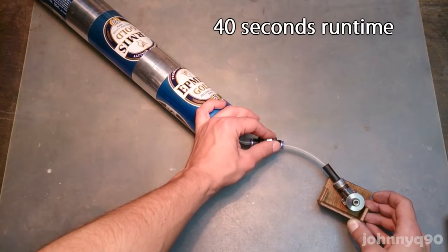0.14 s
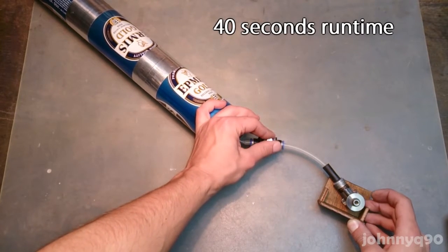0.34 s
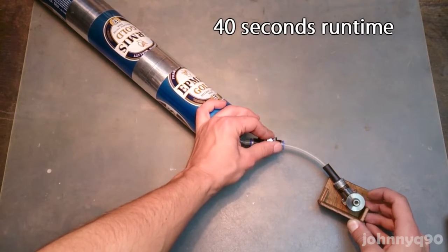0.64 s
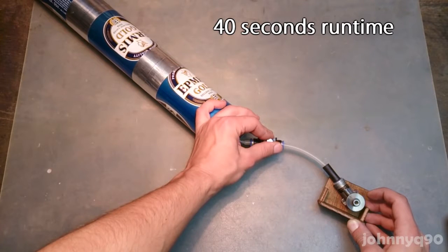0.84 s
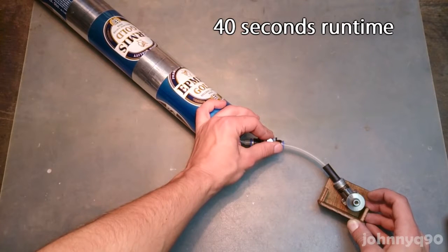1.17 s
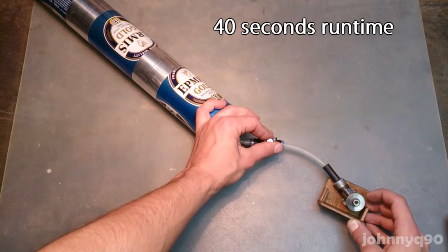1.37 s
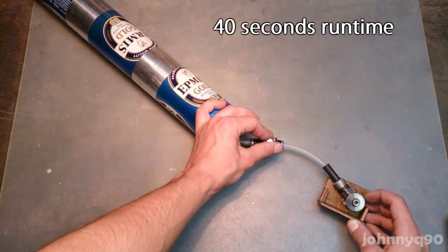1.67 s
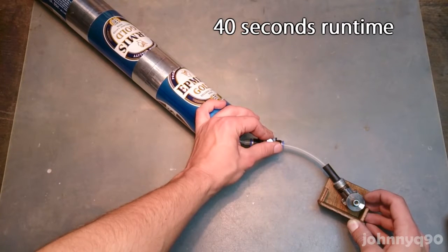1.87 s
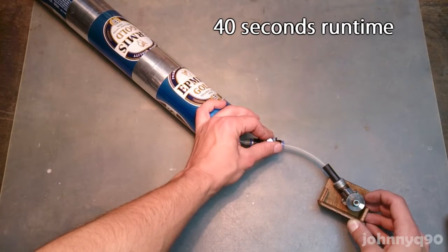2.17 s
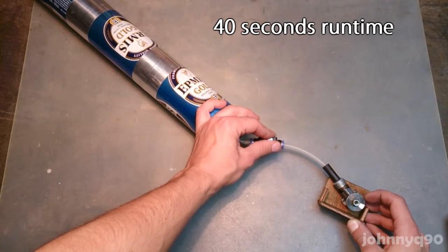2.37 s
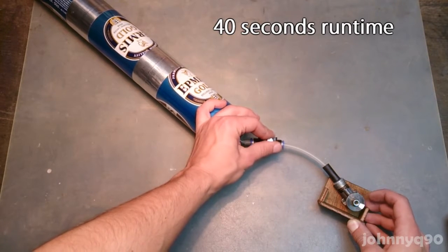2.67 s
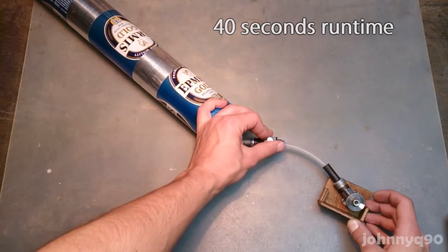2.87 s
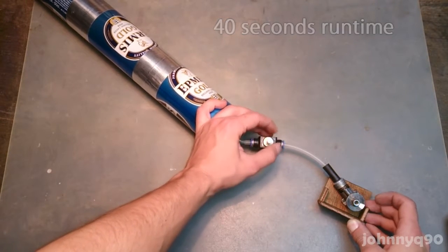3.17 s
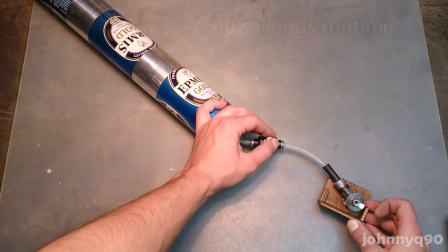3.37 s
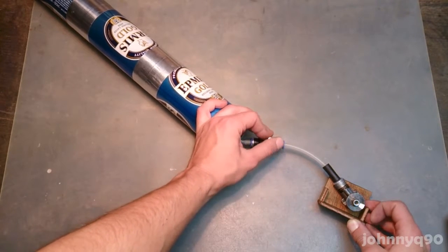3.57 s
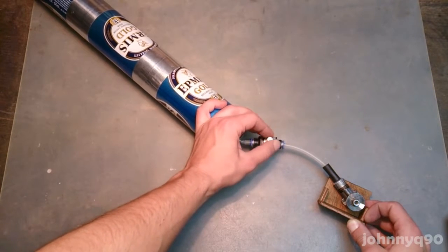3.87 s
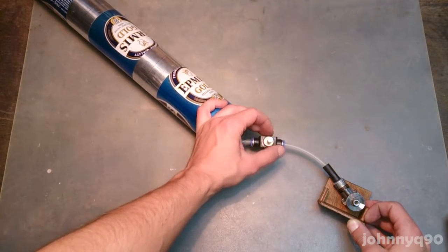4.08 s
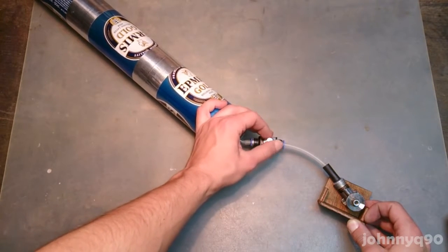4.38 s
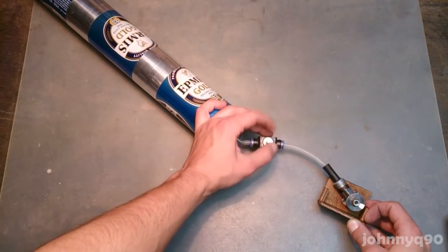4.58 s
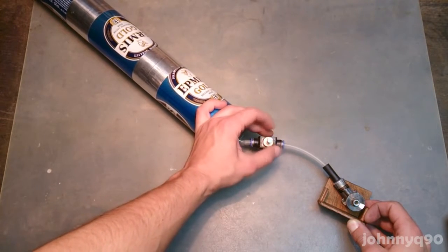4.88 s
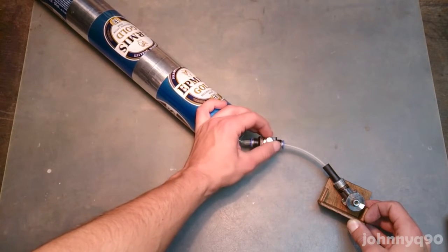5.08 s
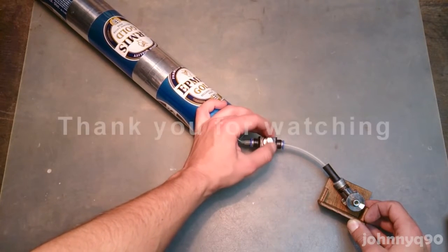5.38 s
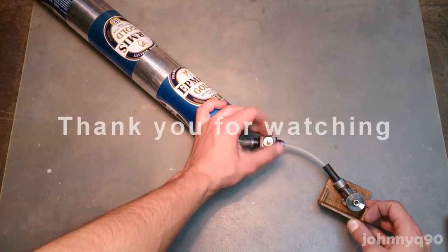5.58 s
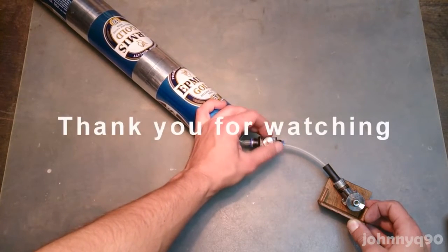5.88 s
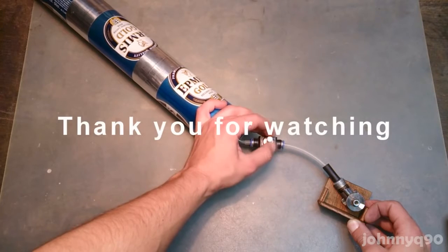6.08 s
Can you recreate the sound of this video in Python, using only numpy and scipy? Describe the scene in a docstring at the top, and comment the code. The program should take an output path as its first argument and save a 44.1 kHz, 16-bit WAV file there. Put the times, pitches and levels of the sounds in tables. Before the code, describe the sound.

A tiny air motor buzzes rapidly with spitting exhaust, slows and stalls, then air hisses on through it, dipping and fading.

```python
"""On a workbench, a tiny single-piston air motor runs from a can, through a hand valve.
Every turn lets out a thump, made of a pressure pulse and ringing parts, and a spit and puff of shaped noise.
The motor slows and stalls just before two seconds. Air, also shaped noise, goes on hissing through it,
dips and swells as the valve is turned, and fades as the can empties. A low room rumble lies underneath."""
import sys
import numpy as np
from scipy import signal
from scipy.fft import rfft, irfft
from scipy.io import wavfile

SR = 44100
rng = np.random.default_rng(int(sys.argv[2]) if len(sys.argv) > 2 else 0)


def master(y):
    """Save y as 16-bit WAV."""
    cut = np.clip(np.atleast_2d(y).T, -1, 1)
    pcm = np.round(cut * 32767)  # scale
    wavfile.write(sys.argv[1], SR, pcm.astype(np.int16))


N = 274743
T = np.arange(N) / SR
HZ = np.fft.rfftfreq(N, 1 / SR)
STALL_S = 1.93


def gain_of(db):
    """Turns decibels into a gain."""
    return 10 ** (np.asarray(db) / 20)


def evened(x):
    """Scales a signal to an rms of 1."""
    return x / np.sqrt(np.mean(x ** 2) + 1e-20)


def read(points, hz):
    """Reads a spectrum, joined by straight lines over log frequency."""
    point_hz, value = np.transpose(points)
    return np.interp(np.log(hz + 1), np.log(point_hz + 1), value)


def shaped(x, db):
    """Colours a sound by a gain in dB at each frequency."""
    return irfft(rfft(x) * gain_of(db), N)


def sides(db):
    """Splits a left-over-right level in dB evenly between the two channels."""
    return np.array([db, -db]).reshape(2, -1) / 2


def noise(db, shared):
    """Makes two channels of coloured noise with a share in common; their mean has an rms of 1."""
    left, right, common = rng.standard_normal((3, N))
    shared = np.clip(shared, 0, 1)
    mixed = np.sqrt(1 - shared) * np.array([left, right]) + np.sqrt(shared) * common
    coloured = shaped(mixed, db)
    return coloured / coloured.mean(0).std()


def wander(rate_hz):
    """Makes a slow random drift with an rms of 1."""
    smoothing = 1 / (1 + (HZ / rate_hz) ** 2)
    return evened(irfft(rfft(rng.standard_normal(N)) * smoothing, N))


def causal(points, size=4096):
    """Makes the sharpest one-sided pulse that has this spectrum (minimum phase)."""
    hz = abs(np.fft.fftfreq(size, 1 / SR))
    log_gain = np.log(gain_of(read(points, hz)))
    return np.fft.ifft(np.exp(np.conj(signal.hilbert(log_gain)))).real


def reflected(x, wet_db, t60, size=8192):
    """Adds sparse reflections from bench and walls, different in each channel; they fade 60 dB in t60 s."""
    t = np.arange(size) / SR
    present = (rng.random((2, size)) < 1 / 20) * (t > 1 / 1000)
    taps = rng.standard_normal((2, size)) * present
    taps = taps * np.exp(-np.log(1000) * t / t60)
    taps *= gain_of(wet_db) / np.linalg.norm(taps, axis=1, keepdims=True)
    wet = signal.oaconvolve(x, taps, axes=1)[:, :N]
    return (x + wet) / np.sqrt(1 + gain_of(wet_db) ** 2)


# How fast the crank turns as it slows. Each row: time in seconds, speed in turns per second.
CRANK_SPEED = [(0.0, 39.98), (0.3, 39.94), (0.6, 39.49), (0.9, 38.71), (1.2, 36.96), (1.4, 35.44),
               (1.6, 33.3), (1.8, 30.25), (1.92, 25.38)]


def crank_speed():
    """Joins the crank speeds by straight lines over time."""
    seconds, turns_per_s = np.transpose(CRANK_SPEED)
    return np.interp(T, seconds, turns_per_s)


def slowing_db():
    """Tells in dB how far the crank has fallen below its full speed."""
    speed = crank_speed()
    return 20 * np.log10(speed / speed.max())


def crank():
    """Adds up the turns and gives the times the exhaust port opens, once a turn until the stall."""
    turns = np.cumsum(crank_speed()[T < STALL_S]) / SR
    return np.interp(np.arange(.5, turns[-1]), turns, T[:len(turns)])


# How much louder the motor is on the left than on the right. Each row: frequency in Hz, difference in dB.
MOTOR_LEFT_OVER_RIGHT = [(300, 0.91), (700, 2), (1000, 4.9), (2500, 2.3), (4000, 0.67), (5000, 5.7),
                         (7000, 7), (9800, 12.5), (12000, 7.7), (16000, 1.7)]


def motor_sides():
    """Places the motor between left and right at each frequency."""
    return sides(read(MOTOR_LEFT_OVER_RIGHT, HZ))


# Resonances of the air passages. Each row: centre in Hz, width in Hz, lift in dB.
PASSAGE_RESONANCES = [(341, 47, 12.5), (597, 43, 4.5), (1356, 66, 10.5), (1625, 350, 8.5), (1900, 78, 5.5),
                      (2870, 310, 4.5), (4577, 138, 10), (4800, 156, 6), (5150, 260, 7), (5454, 230, 5),
                      (6400, 80, 1.5), (8370, 140, 3), (12600, 110, 1.5)]


def passages():
    """Gives the lift in dB that the air passages lend to noise rushing through them."""
    return sum(db * np.exp(-2 * ((HZ - hz) / width) ** 2) for hz, width, db in PASSAGE_RESONANCES)


# Colour of the room rumble. Each row: frequency in Hz, relative level in dB per Hz.
RUMBLE_COLOUR = [(15, -4.5), (35, 1), (52, -23), (66, 3.5), (77, 5.5), (92, -10), (150, -12), (260, -17.5),
                 (600, -19), (850, -24.5), (1300, -16.5), (2200, -32), (16000, -42)]
# Colour of the exhaust's draught on the microphone. Each row: frequency in Hz, relative level in dB per Hz.
DRAUGHT_COLOUR = [(15, -17), (35, 3), (80, 5), (150, -6), (300, -2), (800, -45)]


def room(rumble_db=-59.0, draught_db=-54, draught_sag=3.5):
    """Rumbles low, and buffets mostly the left microphone with exhaust air while the motor runs."""
    rumble = gain_of(rumble_db) * noise(read(RUMBLE_COLOUR, HZ), shared=0.81)
    blowing = gain_of(draught_sag * slowing_db()) * (T < STALL_S)
    draught = noise(read(DRAUGHT_COLOUR, HZ) + sides(db=14), shared=.1)
    return rumble + gain_of(draught_db) * blowing * draught


# The can drains slowly at first, then faster: flow would reach zero at EMPTY_S, along this power of time.
EMPTY_S, DRAIN_POWER = 6.816, 1.45


def draining_db():
    """Tells in dB how far the flow from the can has fallen since the stall."""
    spent = np.clip((T - STALL_S) / (EMPTY_S - STALL_S), 0, 1)
    return 20 * np.log10(1 - spent ** DRAIN_POWER + 1e-6)


# The fingers turn the valve down and back.
# Each row: start in seconds, closing time in s, holding time in s, reopening time in s, depth in dB.
VALVE_MOVES = [(2.3, 0.12, 0.5, 0.16, 3.0), (2.68, 0.028, 0.078, 0.16, 3.5), (3.17, 0.32, 0.08, 0.17, 1)]


def valve_db():
    """Gives the loss at the valve: each move closes it a little, holds, and opens it again."""
    return -sum(depth_db * np.interp(T, np.cumsum(stages), [0, 1, 1, 0])
                for *stages, depth_db in VALVE_MOVES)


# Colour of the steady leak. Each row: frequency in Hz, relative level in dB per Hz.
LEAK_COLOUR = [(100, -49), (280, -31), (600, -14.5), (850, -18.5), (1100, -16.5), (1500, -19.5),
               (2300, -9.5), (2750, -1.5), (4200, 2), (5200, 1.5), (7000, -9), (8500, -8), (14200, -6),
               (16000, -12)]
# How much louder the leak is on the left than on the right. Each row: frequency in Hz, difference in dB.
LEAK_LEFT_OVER_RIGHT = [(300, 0), (1000, 4), (2500, 3), (4000, 3.5), (5000, 9.5), (6500, 7), (9500, 12.5),
                        (12000, 7.5), (16000, 12)]
# Level of the leak's lower band with the motor stopped (dB), and dB lost for each dB the can's flow falls.
LEAK_DB, LEAK_SAG = -29, 1.296
# Treble of the jet over the pipe band (dB), and dB it dulls for each dB lost to draining and to the valve.
JET_DB, DRAIN_DULLS, VALVE_DULLS = 3.5, 0.28, 0.57
# A turning motor makes the leak weaker and brighter (dB); this changes over within HANDOVER_S of the stall.
RUNNING_DB, RUNNING_JET_DB, HANDOVER_S = -8, 5, 0.056


def leak(flutter_db=0.59):
    """Hisses with turbulent air in the passages, weaker and duller as the can drains or the valve closes."""
    running = np.interp(T, [STALL_S - HANDOVER_S, STALL_S + HANDOVER_S], [1, 0])
    drained_db, throttled_db = draining_db(), valve_db()
    flow_db = LEAK_DB + LEAK_SAG * drained_db + throttled_db + RUNNING_DB * running
    brightness_db = JET_DB + DRAIN_DULLS * drained_db + VALVE_DULLS * throttled_db
    brightness_db += RUNNING_JET_DB * running
    side_db = sides(read(LEAK_LEFT_OVER_RIGHT, HZ))
    air = noise(read(LEAK_COLOUR, HZ) + passages() + side_db, shared=0.28)
    air = reflected(air, wet_db=-4.5, t60=.09)
    # split near 6500 Hz, so that the treble can brighten and dull by itself
    pipe = irfft(rfft(air) / (1 + (HZ / 6500) ** 8), N)
    jet = air - pipe
    hiss = pipe / pipe.mean(0).std() + gain_of(brightness_db) * jet / jet.mean(0).std()
    return hiss * gain_of(flow_db + flutter_db * wander(22))


# Colour of air blowing past the piston between puffs. Each row: frequency in Hz, relative level in dB per Hz.
BLOW_BY_COLOUR = [(150, -8.5), (500, 7), (1700, 12), (2200, 5), (2800, 12.5), (4000, 8.5), (7000, -2.5),
                  (10000, 12), (16000, -32.5)]


def blow_by(level_db=-31, fall=5):
    """Lets air slip past the piston all through the turn, less as the motor slows."""
    speed = crank_speed()
    running = np.interp(T, [1.85, STALL_S], [1, 0])
    air = noise(read(BLOW_BY_COLOUR, HZ) + motor_sides(), shared=0.026)
    return gain_of(level_db) * running * (speed / speed.max()) ** fall * air


# Colour of the first spit of air from the port. Each row: frequency in Hz, relative level in dB per Hz.
SPIT_COLOUR = [(150, -24), (500, -10), (1400, -11), (2200, -15), (2900, -9), (3900, -12), (5400, -6),
               (6500, -9), (8700, -1), (10300, 0), (13500, -9), (16000, -8)]
# Colour of the air the returning piston pushes out. Each row: frequency in Hz, relative level in dB per Hz.
PUFF_COLOUR = [(150, -11), (500, -15.5), (1000, -18), (1800, -12), (3000, -3), (4000, -4), (5000, 3),
               (6900, -3.5), (8300, -1), (10800, 3), (13500, 0.5), (16000, -2.5)]
# Shared level of spit and puff at full speed (dB), and dB lost for each dB that the crank speed falls.
EXHAUST_DB, EXHAUST_SAG = -19.0, 0.78


def exhaust(times):
    """Lets out a sharp spit as the port cracks open, then a longer puff until it shuts."""
    spit_db, spit_s, lead_s, uneven_db = 8.8, .0011, .0003, 1.3
    puff_db, puff_s = 3.8, .0107
    # which stroke is under way, and how many seconds ago it began
    stroke = np.maximum(np.searchsorted(times - lead_s, T) - 1, 0)
    age = np.maximum(T - times[stroke] + lead_s, 0)
    # strokes differ in strength, the puffs half as much in dB as the spits
    chance = rng.standard_normal((len(times), 2))[stroke].T * [[1], [.5]]
    spit_size, puff_size = gain_of(uneven_db * chance)
    u = age / spit_s
    # the spits weaken in the last turns
    last_turns = np.interp(T, [1.86, 1.92], [1, .6])
    spit = spit_size * (u * np.exp(1 - u)) ** 3 * last_turns
    # the slower the crank, the longer and flatter the puff
    speed = crank_speed()
    slowness = speed.max() / speed
    progress = age / (puff_s * slowness ** 2.6)
    puff_shape = (1 - np.exp(-u)) * np.exp(-progress / 2) / (1 + progress ** 10)
    puff = puff_size * puff_shape / slowness
    side_db = motor_sides()
    air = gain_of(spit_db) * spit * noise(read(SPIT_COLOUR, HZ) + side_db, shared=0.1)
    puff_colour_db = read(PUFF_COLOUR, HZ) + .5 * passages() + side_db
    air += gain_of(puff_db) * puff * noise(puff_colour_db, shared=0.043)
    air *= gain_of(EXHAUST_DB + EXHAUST_SAG * slowing_db())
    near = reflected(air, wet_db=-9, t60=.04)
    return reflected(near, wet_db=-7.5, t60=.26)


# Spectrum of the pressure pulse as the port opens. Each row: frequency in Hz, relative level in dB.
PULSE_SPECTRUM = [(20, -34.8), (75, -6.6), (130, -12.9), (200, -28.5), (280, -4.5), (430, 5.2), (650, -2.1),
                  (880, -18.5), (1150, -5.9), (1650, -16.0), (2200, -17.5), (4000, -25.8)]
# What each thump sets ringing in the motor, its base and the bench.
# Each row: frequency in Hz, level in dB against the pulse's peak, time to fade by 60 dB in seconds.
RINGING_PARTS = [(289, -27.5, 0.112), (317, -27.0, 0.112), (352, -12.3, 0.119), (496, -23.2, 0.075),
                 (592, -15.5, 0.07), (699, -22.1, 0.088), (746, -36.8, 0.103), (854, -21.0, 0.042),
                 (1040, -26.8, 0.065), (1311, -23.9, 0.05), (1523, -19.6, 0.022)]
# Level of the thumps at full speed (dB), and dB lost for each dB that the crank speed falls.
THUMP_DB, THUMP_SAG = -28, 2.07


def thumps(times):
    """Sends a pressure pulse from the port at each opening, which rings the motor and the bench."""
    rise_s, low_hz, soft_hz, uneven_db = .0002, 30, 2000, .2
    boom_hz, boom_db = 272, 2
    pulse = causal(PULSE_SPECTRUM)
    t = np.arange(len(pulse)) / SR
    ring = sum(gain_of(db) * np.cos(2 * np.pi * hz * t) * np.exp(-np.log(1000) * t / t60)
               for hz, db, t60 in RINGING_PARTS)
    thump = pulse / pulse.max() + ring * (1 - np.exp(-t / rise_s))
    kicks = np.zeros(N)
    kicks[np.round(times * SR).astype(int)] = gain_of(uneven_db * rng.standard_normal(len(times)))
    # a low cut thins the deep bass of pulse and ringing; a soft treble roll-off rounds the thump
    low_cut = HZ ** 2 / (HZ ** 2 + low_hz ** 2)
    rounding = 1 / (1 + (HZ / soft_hz) ** 4)
    train = irfft(rfft(signal.oaconvolve(kicks, thump)[:N]) * low_cut * rounding, N)
    # the bench top booms
    train = shaped(train, boom_db * np.exp(-((HZ - boom_hz) / 25) ** 2))
    train *= gain_of(THUMP_DB + THUMP_SAG * slowing_db()) / train[T < STALL_S].std()
    return reflected(shaped(train, motor_sides()), wet_db=-16, t60=.3)


def scene():
    """Adds up the room, the leaking air and the running motor."""
    times = crank()
    return room() + leak() + blow_by() + exhaust(times) + thumps(times)


EDGE_HZ = 15920


def record(dry):
    """Clips anything beyond full scale, then cuts the treble above EDGE_HZ."""
    low_pass = signal.firwin(511, EDGE_HZ, window=("kaiser", 9), fs=SR)
    return signal.oaconvolve(np.clip(dry, -1, 1), low_pass[None], "same")


dry = scene()
out = record(dry)
master(out)
```